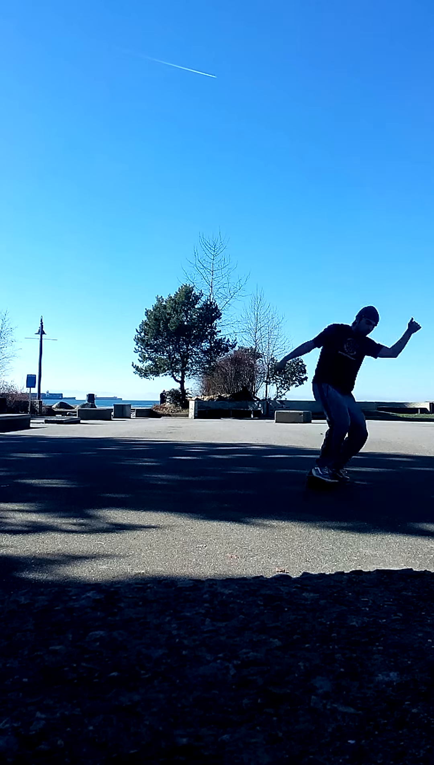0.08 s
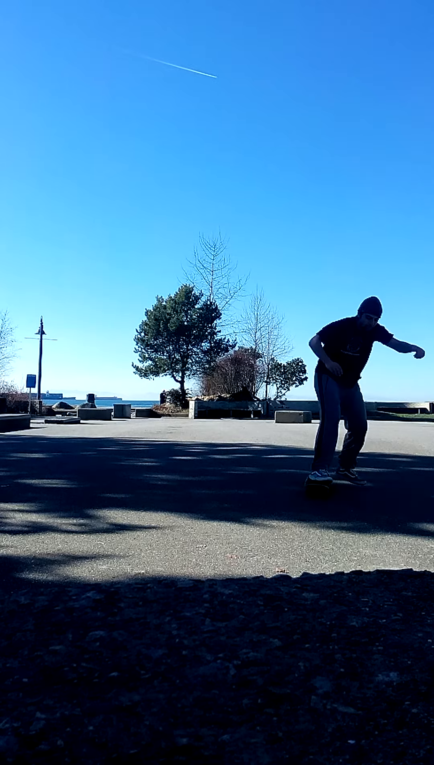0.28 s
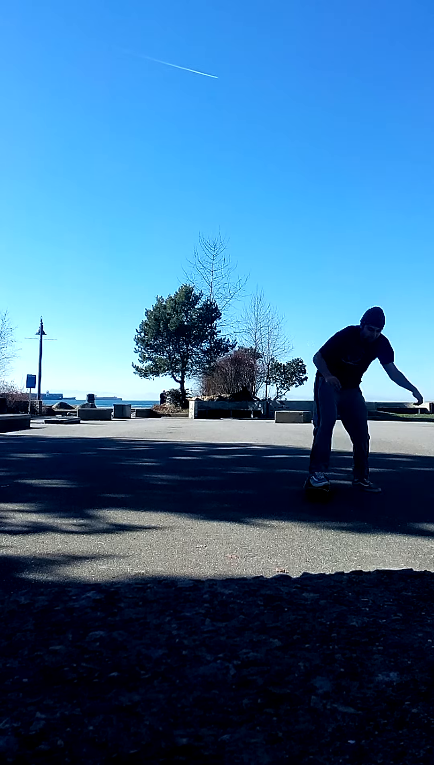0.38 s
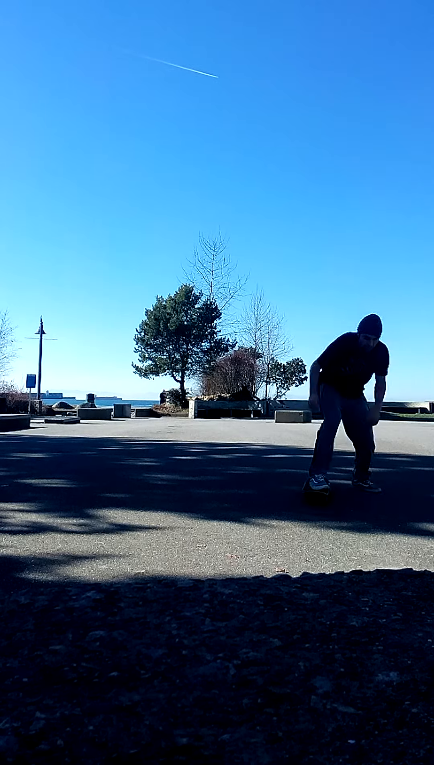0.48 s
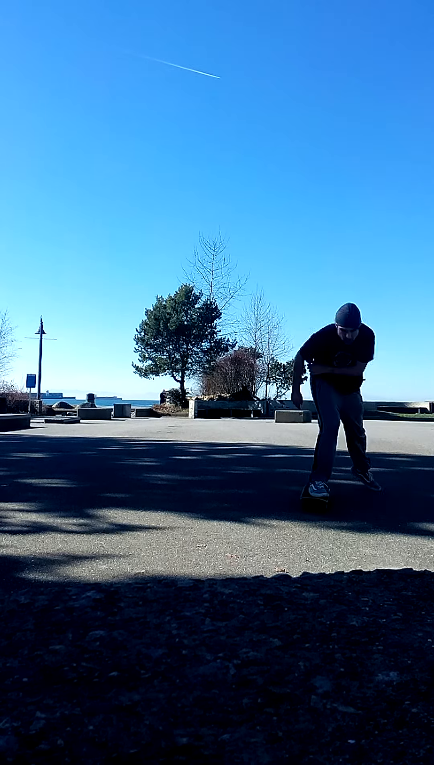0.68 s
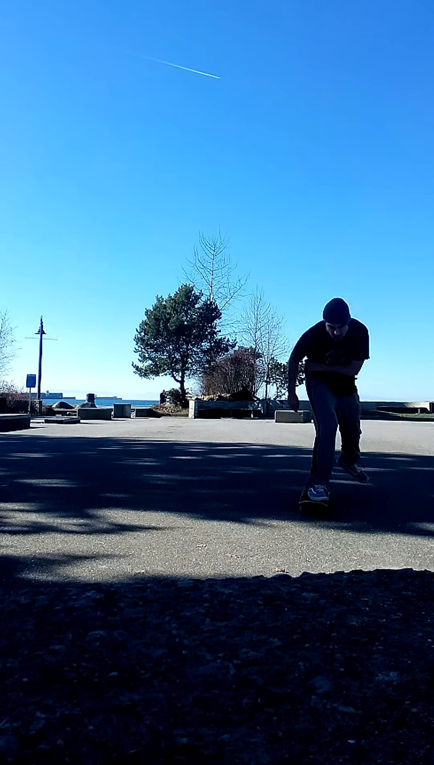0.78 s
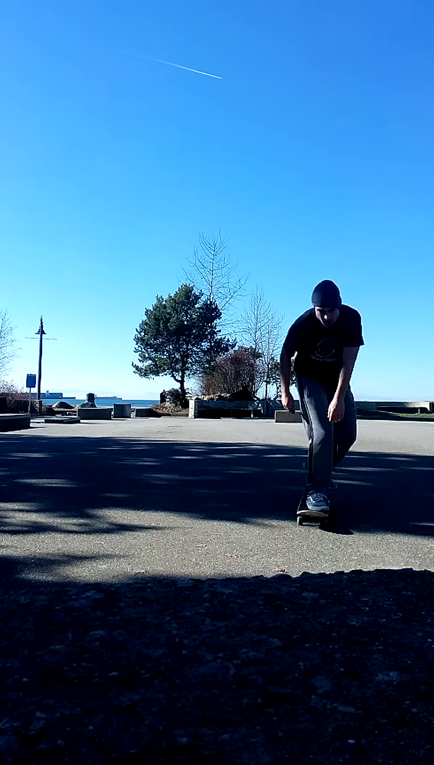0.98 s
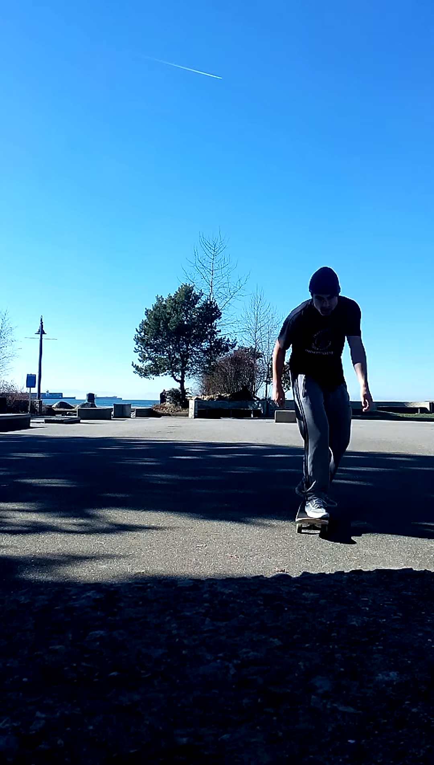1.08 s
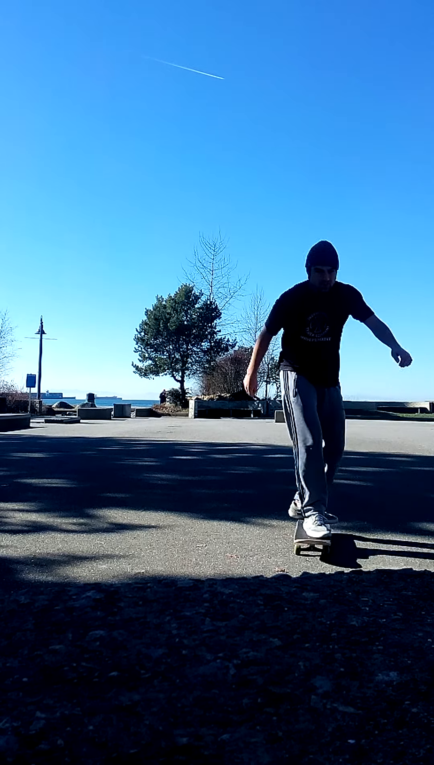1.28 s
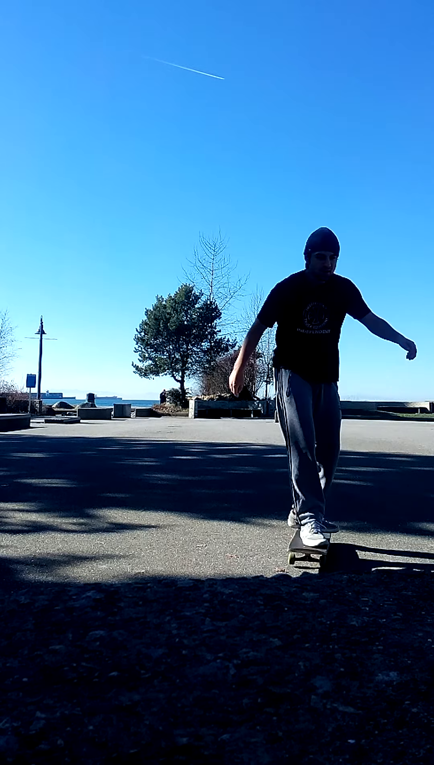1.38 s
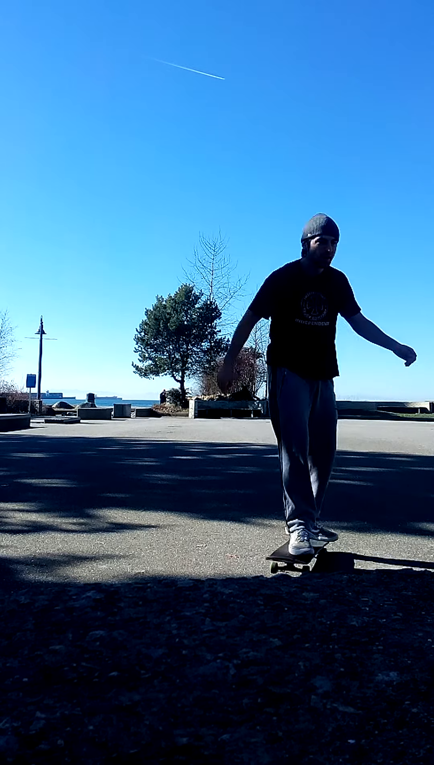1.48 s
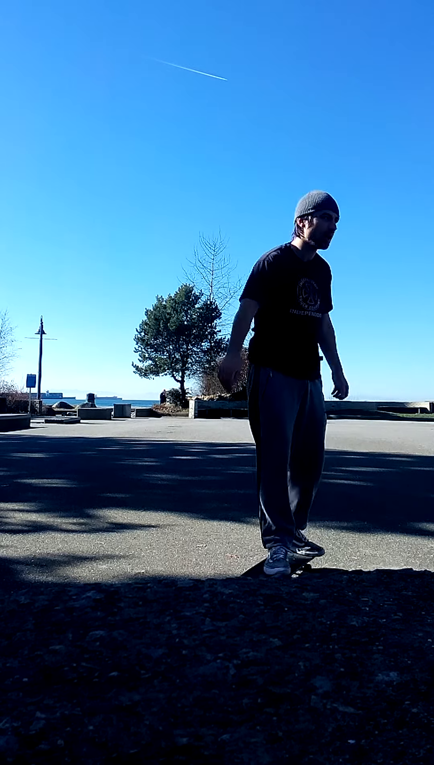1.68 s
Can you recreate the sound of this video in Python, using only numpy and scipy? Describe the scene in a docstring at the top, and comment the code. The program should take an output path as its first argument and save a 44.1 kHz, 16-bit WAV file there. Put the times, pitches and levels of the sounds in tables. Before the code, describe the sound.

A skateboard slaps down on pavement in a rapid, loud cluster of woody clacks with a short open-air echo, rolls briefly over grit, goes quiet, then rumbles up close to a phone on the ground.

```python
"""A park, close to the pavement: a skateboard lands in a clatter of wheel and deck blows, rolls a short way,
goes quiet, then rumbles up close to a phone on the ground and eases off.
Blows and rolling grit ring the same wooden deck and trucks: decaying sines for the blows, noisy grain clicks
through three filters for the rolling. Knocks and thumps are single notes, the wheels sing a rough sliding tone,
and shaped noise makes the top hiss and the park air. The blows alone have an echo."""
import sys
import numpy as np
from scipy import signal
from scipy.fft import rfft, irfft
from scipy.io import wavfile
from scipy.ndimage import uniform_filter1d

SR = 44100
rng = np.random.default_rng(int(sys.argv[2]) if len(sys.argv) > 2 else 0)


def unload_audio(sound):
    """Save the sound as a 16-bit wav file, at the path given as the first command line argument."""
    columns = np.transpose(np.atleast_2d(sound))
    # keep every value between -1 and 1, then stretch to whole-number steps
    steps = np.round(np.clip(columns, -1, 1) * 32767)
    wavfile.write(sys.argv[1], SR, steps.astype(np.int16))


N = 79380  # 1.8 s


def undb(db):
    """Gain of a level in dB."""
    return 10 ** (np.asarray(db) / 20)


def unit(x):
    """Scale to an RMS of 1."""
    return x / np.sqrt(np.mean(x ** 2))


def fade(t, t60):
    """Exponential decay that falls 60 dB in t60 seconds."""
    return np.exp(-np.log(1000) * t / t60)


def colour(x, shape):
    """Minimum-phase filter with the given (pitch_hz, level_db) spectrum."""
    f, db = np.array(shape, float).T
    hz = np.maximum(np.arange(1025) * SR / 2048, 10)
    level_db = np.interp(np.log(hz), np.log(f), db, left=db[0] - 20, right=db[-1] - 20)
    cepstrum = irfft(level_db * np.log(10) / 20)
    # folding the cepstrum onto positive times makes the filter causal
    folded = np.r_[cepstrum[:1], 2 * cepstrum[1:1024], np.zeros(1024)]
    response = irfft(np.exp(rfft(folded)))
    return signal.fftconvolve(x, response)[:len(x)]


def walk(rate):
    """Random levels joined by straight ramps, `rate` of them a second; spread near 1."""
    k = int(SR / rate)
    held = np.repeat(rng.standard_normal(N // 100), k)[:N]
    return 1.2 * uniform_filter1d(held, k)


def add(out, s, x):
    """Mix x in from time s."""
    i = int(s * SR)
    out[i:i + len(x)] += x[:N - i]


def stones(rate, scatter_db):
    """Clicks of wheels over grains of pavement, at random times and uneven strengths."""
    chance, extra, strength = rng.random(N), rng.exponential(size=N), rng.standard_normal(N)
    return (chance < rate / SR) * undb(scatter_db * extra) * strength


# ringing modes of the deck and trucks, for rolling and blows: pitch_hz, level_db, t60_s
DECK_MODES = [(214.3, -5, 0.048), (280.5, -2.5, 0.045), (372.4, -1, 0.057), (425, -3, 0.033),
              (459, -10, 0.05), (520, -10, 0.05), (660, -11, 0.034), (719, -1.5, 0.022),
              (820.5, -1.5, 0.033), (947, -3, 0.035), (1116, -1, 0.028), (1381, 5, 0.0091),
              (1659, 3.5, 0.016), (1956, -3.5, 0.012), (2271, -5, 0.017), (2670, -5.5, 0.011),
              (2955, -9, 0.014), (3380, -10.5, 0.011)]
# how the rolling swells and fades: start_s, rumble_db, deck_ring_db, grit_db
ROLL_LEVELS = [(0, -77, -53.5, -64), (0.08, -67, -63, -68), (0.158, -86, -84, -77),
               (0.172, -39, -38.5, -52), (0.275, -30.5, -34.5, -46), (0.332, -31, -37.5, -51),
               (0.409, -43, -43.5, -54), (0.496, -42, -44, -56), (0.56, -49, -37.5, -46),
               (0.599, -44.5, -41.5, -48), (0.625, -51, -38.5, -50), (0.67, -48, -41, -46),
               (0.74, -43.5, -40, -49.5), (0.785, -68, -45.5, -52.5), (0.831, -43.5, -37.5, -56),
               (0.858, -46, -41.5, -51.5), (0.887, -50.5, -56, -66.5), (0.97, -61, -66, -75),
               (1.038, -54.5, -61, -71.5), (1.099, -49, -58.5, -67), (1.19, -45, -60, -71),
               (1.27, -41.5, -55.5, -63), (1.35, -35, -46.5, -59), (1.45, -34, -46.5, -53),
               (1.549, -32, -43, -49.5), (1.622, -36.5, -37, -42.5), (1.7, -39.5, -42.5, -51.5),
               (1.761, -51.5, -49.5, -67), (1.8, -46.5, -54.5, -59)]
# tone of the low rumble: pitch_hz, level_db (per Hz)
RUMBLE_TONE = [(15, -76.5), (25, -31), (118, 6.5), (258, -1.5), (440, -0.5), (525, -2), (588, 1.5),
               (750, -6), (1200, -21.5), (1560, -54), (2640, -120)]
# tone of the bright grit: pitch_hz, level_db (per Hz)
GRIT_TONE = [(1180, -17.5), (2000, 9), (3000, -12.5), (4200, -5), (5540, -6), (6470, -14.5), (7980, -11),
             (12000, -28.5), (16000, -80)]
# each triple: rumble, deck ring, grit
STONES_PER_S, STONE_SCATTER_DB = (1500, 2800, 5000), (1.2, 1.7, 1.8)
BUMPS_PER_S, BUMP_DB = 45, (.7, 1.6, 1.3)


def rolling():
    """Sparse clicks rumble, denser ones ring the deck, the densest hiss; all swell together over bumps."""
    t = np.arange(N) / SR
    start_s, *levels_db = np.array(ROLL_LEVELS).T
    bumps = walk(BUMPS_PER_S)
    ring_t = t[:SR // 5]
    deck = np.zeros(len(ring_t))
    for k, (hz, db, t60) in enumerate(DECK_MODES):
        if hz > 400:  # the deck ring leaves out the deepest modes
            # neighbouring modes start in opposite directions
            deck += (-1) ** k * undb(db) * np.sin(2 * np.pi * hz * ring_t) * fade(ring_t, t60)
    click = (ring_t == 0) * 1.
    bodies = colour(click, RUMBLE_TONE), deck, colour(click, GRIT_TONE)
    out = np.zeros(N)
    layers = zip(STONES_PER_S, STONE_SCATTER_DB, levels_db, BUMP_DB, bodies)
    for rate, scatter, level_db, bump_db, body in layers:
        swell = undb(np.interp(t, start_s, level_db) + bump_db * bumps)
        drive = unit(stones(rate, scatter)) * swell
        out += signal.fftconvolve(drive, body / np.linalg.norm(body))[:N]
    return out


# tone of the thin hiss: pitch_hz, level_db (per Hz)
TOP_HISS_TONE = [(6500, -19), (8000, -11), (11000, -6.5), (16000, -12.5)]
TOP_HISS_DB = -63.5  # where the louder of rumble and deck ring is at -40 dB
TOP_HISS_FOLLOW = 0.35  # dB per dB of rolling


def top_hiss():
    """Thin noise at the top of the spectrum that rises with the level of the rolling."""
    start_s, rumble_db, deck_db, _ = np.array(ROLL_LEVELS).T
    loud_db = np.interp(np.arange(N) / SR, start_s, np.maximum(rumble_db, deck_db)) + 40
    hiss = unit(colour(rng.standard_normal(N), TOP_HISS_TONE))
    return hiss * undb(TOP_HISS_DB + TOP_HISS_FOLLOW * loud_db)


# tone of the park air: pitch_hz, level_db (per Hz)
PARK_TONE = [(15, -35), (25, 20), (212, -4.5), (344, -13), (1440, -23), (2350, -35.5), (3080, -22),
             (4740, -29.5), (13600, -22.5), (16000, -29)]
PARK_DB = -52


def park_air():
    """Steady background noise, heaviest in the bass, drifting by about 1 dB."""
    return unit(colour(rng.standard_normal(N), PARK_TONE)) * undb(PARK_DB + walk(3.3))


# blows on the board: start_s, low_modes_db, middle_modes_db, high_modes_db, crack_db, contact_s
BLOWS = [(0.031, -64, -50.5, -36.5, -68, 0.0015), (0.1664, -26.5, -26, -18, -31.5, 0.0021),
         (0.171, -37, -37, -21, -35, 0.00093), (0.2157, -6, -18, -2, -22, 0.0002),
         (0.219, -12.5, -9, -5.5, -24, 0.0022), (0.233, -7.5, -7.5, -7.5, -20.5, 0.00037),
         (0.236, -6, -27.5, -10, -9, 0.0016), (0.2401, -8.5, -11.5, -5, -14, 0.001),
         (0.244, -14, -12, -36.5, -26.5, 0.00085), (0.283, -24.5, -21, -38, -41, 0.0004),
         (0.301, -28, -17, -6, -14, 0.00067), (0.3043, -14.5, -5.5, -7.5, -16, 0.00033),
         (0.307, -12, -15, -16.5, -46.5, 0.0022), (0.337, -25, -27.5, -43, -29, 0.00071),
         (0.342, -59, -36, -18.5, -26, 0.00098), (0.452, -79, -52, -19.5, -26, 0.00021),
         (0.455, -29.5, -23.5, -45, -57, 0.00015), (0.489, -40, -61, -37, -55, 0.00024),
         (0.611, -37, -28, -27, -28, 0.0016), (0.64, -32.5, -34.5, -28, -37, 0.0014),
         (0.726, -58, -33, -26.5, -41, 0.00092), (1.582, -36, -29, -46, -34.5, 0.00091),
         (1.608, -37, -40, -27, -32, 0.0013)]
# tone of the noisy crack: pitch_hz, level_db (per Hz)
CRACK_TONE = [(1760, -31), (3000, -8.5), (3620, -8.5), (4570, -18), (5400, -11), (6530, -25.5),
              (8280, -19.5), (16000, -54)]
LOW_TOP_HZ, MID_TOP_HZ = 700, 1800  # where low modes end, where middle modes end
MODE_SCATTER_DB, DETUNE = 1.2, .01  # random spread of each mode; detune is a share of its pitch
CRACK_T60_S, BLOW_BOTTOM_HZ = 0.015, 170


def blows():
    """A blow swells in over its contact time, rings the modes and cracks; ring and crack come out apart."""
    out, t = np.zeros((2, N)), np.arange(SR // 5) / SR
    hz, db, t60 = np.array(DECK_MODES).T[:, :, None]
    group = (hz > LOW_TOP_HZ).astype(int) + (hz > MID_TOP_HZ)
    for s, low_db, mid_db, high_db, crack_db, contact in BLOWS:
        loudness, detune, side = rng.standard_normal((3, len(DECK_MODES), 1))
        mode_db = db + np.array([low_db, mid_db, high_db])[group] + MODE_SCATTER_DB * loudness
        # where a blow lands decides which way it pushes each mode: drawn at random
        gain = undb(mode_db) * np.sign(side)
        tones = np.sin(2 * np.pi * hz * (1 + DETUNE * detune) * t)
        ring = (gain * tones * fade(t, t60)).sum(axis=0)
        noise = unit(colour(rng.standard_normal(len(t)), CRACK_TONE))
        crack = undb(crack_db) * noise * fade(t, CRACK_T60_S)
        onset = 1 - np.exp(-t / contact)
        add(out[0], s, ring * onset)
        add(out[1], s, crack * onset)
    return signal.sosfilt(signal.butter(2, BLOW_BOTTOM_HZ, "high", fs=SR, output="sos"), out)


RING_ECHO_DB, CRACK_ECHO_DB, ECHO_T60_S = -16.5, -13.5, 0.46


def blows_with_echo():
    """The blows plus a diffuse echo: decaying noise that starts 6 ms after each one."""
    ring, crack = blows()
    t = np.arange(SR // 2) / SR
    echo = rng.standard_normal(len(t)) * fade(t, ECHO_T60_S) * (t > .006)
    scattered = undb(RING_ECHO_DB) * ring + undb(CRACK_ECHO_DB) * crack
    return ring + crack + signal.fftconvolve(scattered, echo / np.linalg.norm(echo))[:N]


# rounded knocks and thumps: start_s, level_db, pitch_hz, length_s
THUMPS = [(0.167, -23, 502, 0.005), (0.233, -35.5, 101, 0.026), (0.3, -15.5, 218, 0.008),
          (0.334, -33.5, 95, 0.027), (1.046, -39.5, 109, 0.04), (1.064, -38, 1620, 0.0016),
          (1.078, -40.5, 664, 0.0036), (1.35, -28, 194, 0.015), (1.409, -34.5, 75, 0.021)]


def thumps():
    """Single-note knocks and thumps, each with a rounded envelope that peaks at half its length."""
    out = np.zeros(N)
    for s, db, hz, length in THUMPS:
        t = np.arange(int(3 * length * SR)) / SR
        envelope = np.e * (2 * t / length) * np.exp(-2 * t / length)  # peaks at 1
        add(out, s, undb(db) * envelope * np.sin(2 * np.pi * hz * t))
    return out


# glide of the wheels' ringing, sagging and then climbing partway back: start_s, pitch_hz, level_db
WHEEL_RING = [(0.51, 840, -53), (0.55, 813.5, -41.5), (0.62, 792, -47.5), (.655, 660, -40), (.73, 587, -42),
              (.775, 587.6, -66), (0.8, 608.7, -41.5), (.845, 646.7, -42), (0.875, 670, -55),
              (.94, 651, -60.5)]
WHEEL_RING_WIDTH_HZ, WHEEL_RING_STEADY = 65, 0.95  # noise bandwidth; steady tone against the noise


def wheel_ring():
    """A ringing of the wheels: a tone on a sliding pitch, roughened by narrow noise around it."""
    t, (start_s, hz, db) = np.arange(N) / SR, np.array(WHEEL_RING).T
    a = np.exp(-np.pi * WHEEL_RING_WIDTH_HZ / SR)
    slow = signal.lfilter([1], [1, -a], rng.standard_normal((2, N)))
    phase = 2 * np.pi * np.cumsum(np.interp(t, start_s, hz)) / SR
    in_phase = (unit(slow[0]) + WHEEL_RING_STEADY) * np.cos(phase)
    quadrature = unit(slow[1]) * np.sin(phase)
    level_db = np.interp(t, start_s, db, left=-99, right=-99)
    return unit(in_phase + quadrature) * undb(level_db)


def scene():
    """Mix all the layers into one channel."""
    board = blows_with_echo() + thumps()
    air = park_air()
    return (board + air + rolling() + wheel_ring() + top_hiss())[None]


CLIP = 1.0  # full-scale ceiling of the peaks
BOTTOM_HZ, TOP_HZ = 55, 16300


def record(dry):
    """The phone drops the deepest bass, flattens the loudest peaks and cuts the top."""
    trimmed = signal.sosfilt(signal.butter(2, BOTTOM_HZ, "high", fs=SR, output="sos"), dry)
    flattened = trimmed / (1 + (trimmed / CLIP) ** 6) ** (1 / 6)
    return signal.sosfilt(signal.ellip(10, .2, 70, TOP_HZ, fs=SR, output="sos"), flattened)


dry = scene()
out = record(dry)
unload_audio(out)
```